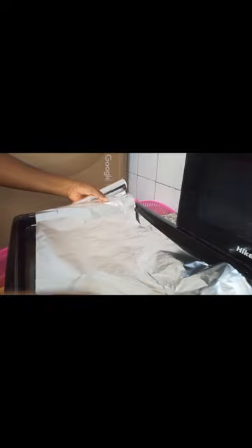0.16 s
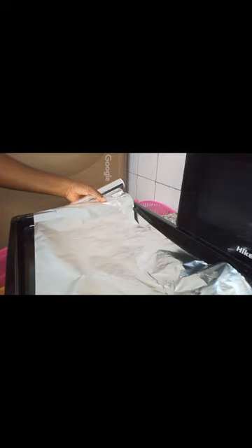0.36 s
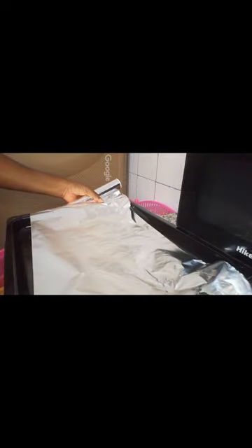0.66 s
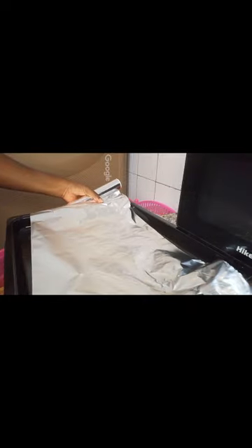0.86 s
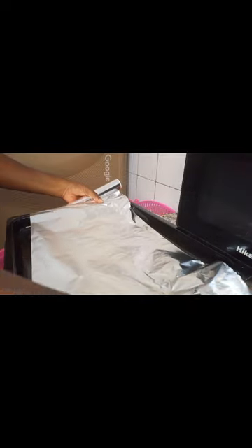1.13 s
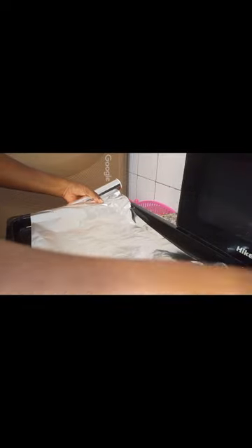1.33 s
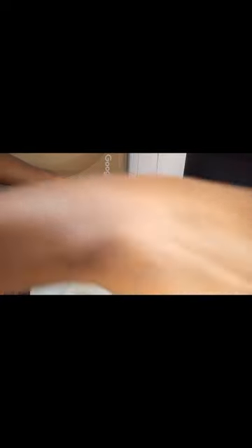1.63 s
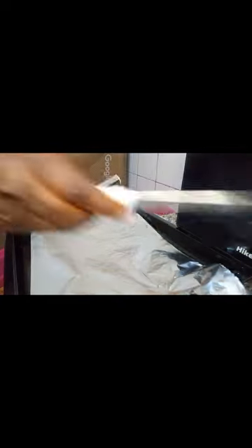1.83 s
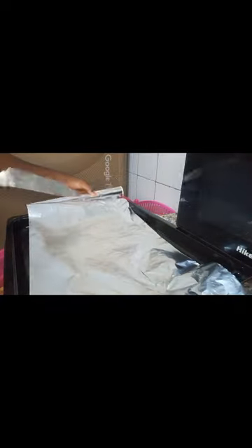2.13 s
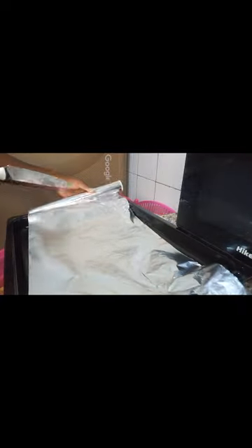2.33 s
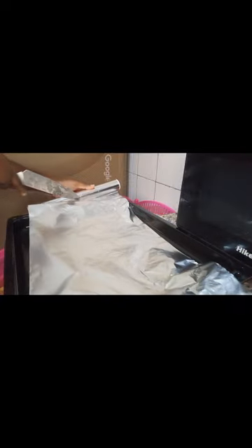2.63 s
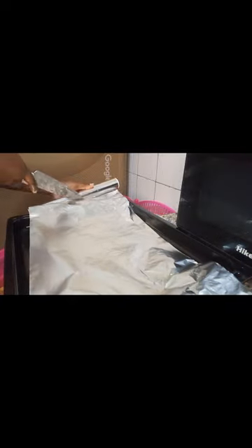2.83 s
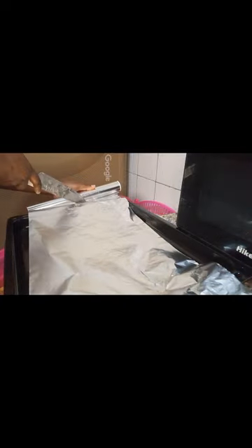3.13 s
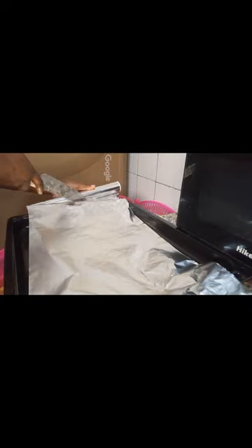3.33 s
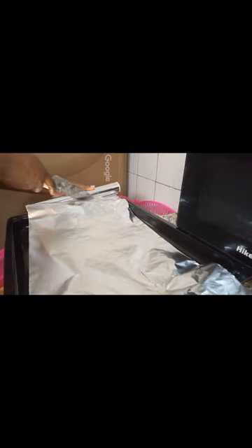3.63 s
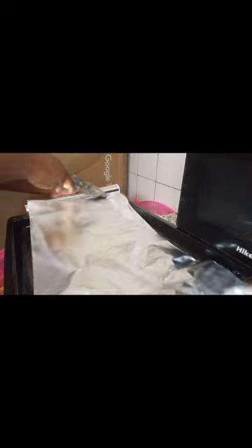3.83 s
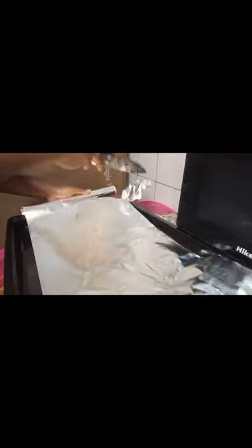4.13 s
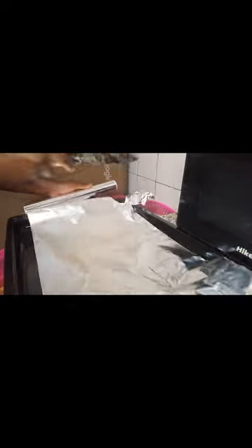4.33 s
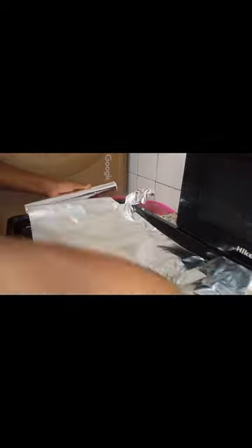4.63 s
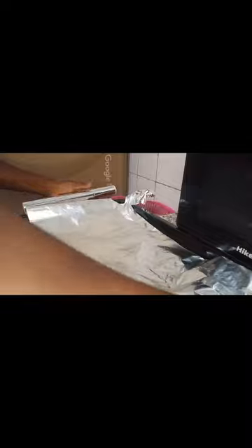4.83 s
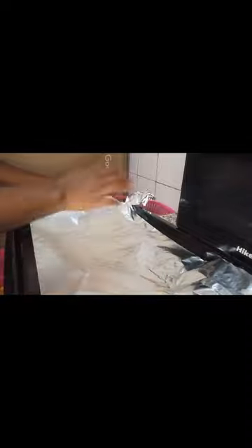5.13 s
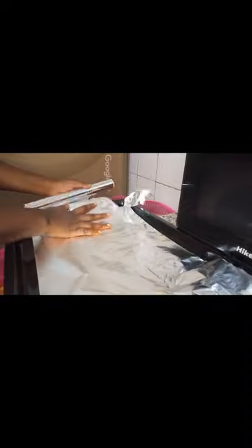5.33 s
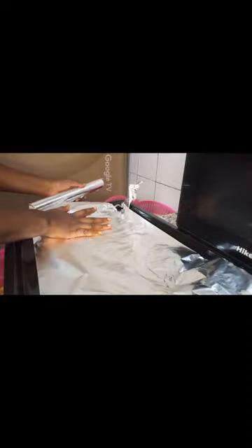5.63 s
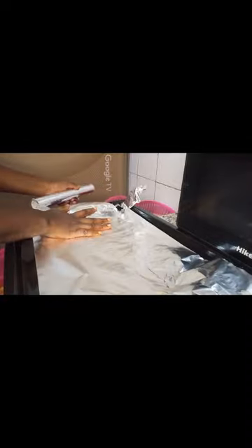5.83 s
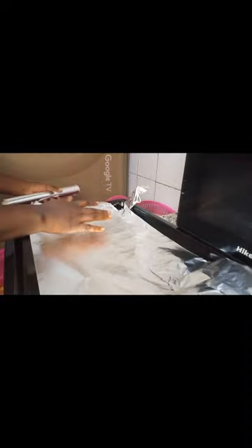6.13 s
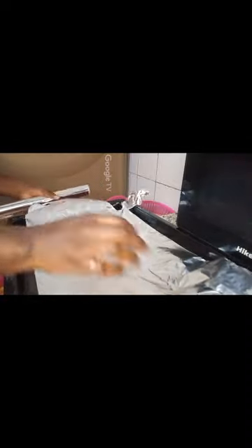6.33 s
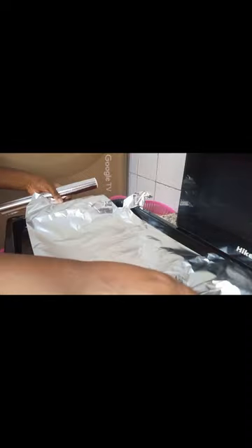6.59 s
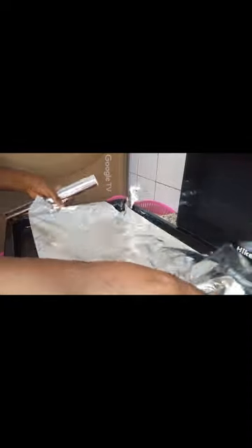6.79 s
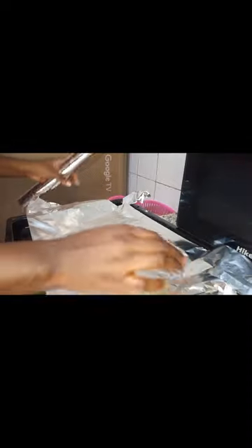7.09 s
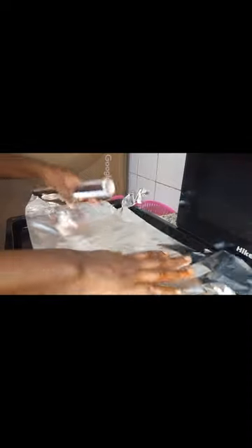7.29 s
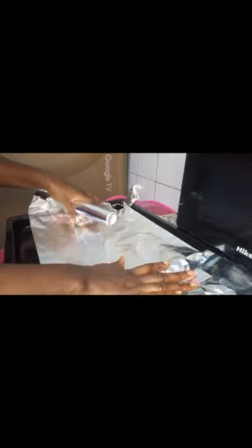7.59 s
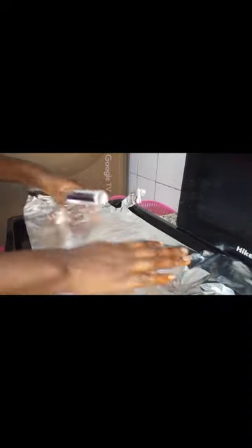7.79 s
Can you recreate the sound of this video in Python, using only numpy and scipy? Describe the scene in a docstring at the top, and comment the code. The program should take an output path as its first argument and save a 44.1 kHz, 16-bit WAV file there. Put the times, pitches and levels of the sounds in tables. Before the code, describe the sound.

Thin aluminium foil is pulled and smoothed over a baking tray, close to a phone in a small tiled kitchen. Bright crackle comes in short overlapping strokes, with tinny panel rattles, sharp snaps and hollow pops. Dull slaps and low tray drumming sound under the palm. It eases briefly after four seconds, then knocks, slaps and rustles on to the end over faint hush.

```python
"""Aluminium foil is pulled from its roll and pressed flat over a baking tray in a small tiled kitchen.
Creases give way in avalanches of clicks and wider panels buckle and rattle: filtered noise under pulse trains.
The palm makes the foil drum on the tray, whose resonances ring; snaps, pops and slaps are decaying noise bursts.
Taut spans hum as decaying sines, and once the foil squeaks as narrow-band noise. A faint hush lies below.
A phone close by hears it with the room, modelled as a decaying stereo noise response."""
import sys
import numpy as np
from scipy import signal
from scipy.fft import rfft, irfft
from scipy.io import wavfile
from scipy.ndimage import uniform_filter1d

SR = 44100
rng = np.random.default_rng(int(sys.argv[2]) if len(sys.argv) > 2 else 0)


def materialize(psi):
    """Save the field psi as 16-bit PCM at rate SR to the path in sys.argv[1].

    A 1-D psi becomes a single channel; in a 2-D psi each row is a channel.
    """
    bounded = np.clip(np.atleast_2d(psi).T, -1, 1)
    quanta = np.round(bounded * 32767).astype(np.int16)
    wavfile.write(sys.argv[1], SR, quanta)


N = 350595
TIME = np.arange(N) / SR

# where the foil is worked: t/s, lag of the left ear/ms
FOIL_PLACE = [(0, -0.05), (.7, -0.31), (1.7, 0.094), (4.3, 0.1), (4.7, -0.41), (5.6, .09), (6.3, 0.11),
              (6.7, -0.27)]
# the hands pull, lift or smooth the foil: start t/s, length/s, fine creasing level/dB, panel flexing level/dB
HAND_STROKES = [(-.04, 0.031, -13, -23), (.05, 0.085, -20.5, -27.5), (0.253, 0.026, -26, -36.5),
                (0.377, 0.12, -21, -27.5), (.53, .16, -18.5, -28), (0.688, 0.13, -26.5, -28),
                (.89, 0.52, -33, -26), (1.067, 0.091, -21, -39), (1.37, 0.24, -25.5, -29.5),
                (1.614, 0.64, -27, -35.5), (1.876, 0.095, -20.5, -25.5), (2.264, 0.086, -21.5, -25.5),
                (2.418, 0.043, -23.5, -28), (2.601, 0.14, -20, -27.5), (2.823, 0.55, -20.5, -23),
                (2.902, 0.048, -14, -19), (3.204, 0.081, -18, -20), (3.4, 0.24, -17.5, -23),
                (3.675, .29, -14, -23), (3.999, 0.28, -18, -30.5), (4.414, 0.2, -38.5, -38),
                (4.556, 0.029, -29.5, -37), (4.7, 0.2, -27.5, -27), (4.908, 0.098, -29, -22),
                (5.119, 0.067, -27.5, -30), (5.235, 0.11, -17, -31), (5.421, 0.26, -18.5, -22.5),
                (5.72, .27, -20.5, -25), (5.988, .13, -16.5, -32), (6.31, 0.097, -25.5, -33.5),
                (6.473, 0.54, -18.5, -24.5), (7.27, 0.055, -26, -28), (7.316, 0.12, -19, -23.5),
                (7.4, .32, -17, -30), (7.703, 0.14, -25, -23.5)]
# relative spectrum of fine creases: f/Hz, density level/dB
CREASE_SPECTRUM = [(200, -24), (800, -21), (2000, -3), (3500, -0.5), (6700, 0.5), (8000, -7), (10000, -5.5),
                   (12300, -2.5), (14500, -6.5)]
# relative spectrum of the wider panels: f/Hz, density level/dB
PANEL_SPECTRUM = [(80, -29.5), (250, -13.5), (550, -0.5), (1800, 4), (3000, -3), (6000, -12), (16000, -55)]
# relative spectrum of the sheet against the tray: f/Hz, density level/dB
SHEET_SPECTRUM = [(25, -31), (50, -24), (85, 0.5), (200, -2.5), (450, 3.5), (800, 1.5), (2000, -6.5),
                  (8000, -42)]
# resonances of a wide panel: f/Hz, bandwidth/Hz, gain/dB
PANEL_MODES = [(1115, 65, -6), (1860, 230, -1), (2450, 120, -5.5), (3150, 140, -12.5)]


def undb(db):
    """Amplitude ratio: a level in decibels becomes a linear gain."""
    return 10 ** (np.asarray(db) / 20)


def unit(x):
    """Normalisation by effective value: the same sound at rms 1."""
    return x / np.sqrt(np.mean(x ** 2))


def curve(rows, at=TIME):
    """Linear interpolation: a control runs straight between its points."""
    return np.interp(at, *np.transpose(rows))


def fade(t, t60):
    """Exponential damping: amplitude falls 60 dB in t60 seconds."""
    return np.exp(-np.log(1000) * t / t60)


def log_curve(rows, hz):
    """Logarithmic frequency scale: a table over frequency, straight on a log axis."""
    f, value = np.transpose(rows)
    return np.interp(np.log(hz + 1), np.log(f), value)


def ring(x, response):
    """Linear superposition: convolve each channel with an impulse response."""
    return signal.oaconvolve(x, response, axes=-1)[:, :x.shape[-1]]


def colour(x, spectrum):
    """Minimum-phase filtering: a folded cepstrum gives a causal filter of the given (Hz, dB) response."""
    size = 4096
    gain = undb(log_curve(spectrum, np.fft.rfftfreq(size, 1 / SR)))
    cepstrum = irfft(np.log(gain))
    # fold negative times onto positive ones
    cepstrum[1:size // 2] *= 2
    cepstrum[size // 2 + 1:] = 0
    response = irfft(np.exp(rfft(cepstrum)))
    return ring(x, response[None])


def resonance(x, hz, width_hz):
    """Damped oscillator: a two-pole band-pass with gain 1 at the centre."""
    return signal.lfilter(*signal.iirpeak(hz, hz / width_hz, fs=SR), x)


def body(x, modes):
    """Modal superposition: a sound through a sum of (Hz, width, dB) resonances."""
    return sum(undb(db) * resonance(x, hz, width) for hz, width, db in modes)


def stereo_noise(size, apart):
    """Interaural coherence: two noises, alike (apart 0) or unrelated (apart 1)."""
    apart = np.clip(apart, 0, 1)
    shared = np.sqrt(1 - apart) * rng.standard_normal(size)
    return shared + np.sqrt(apart) * rng.standard_normal((2, size))


def burst(envelope, apart):
    """High modal density: the ringing of thin foil acts as noise under an envelope."""
    return stereo_noise(len(envelope), apart) * envelope


def struck(x, db, first_s):
    """Onset level: scale a blow so that its first moments have the given rms level."""
    onset = x[:, :int(first_s * SR)]
    return x / onset.std() * undb(db)


def add(out, s, sound):
    """Superposition: mix a stereo sound in at time s."""
    start = max(int(s * SR), 0)
    out[:, start:start + sound.shape[1]] += sound[:, :N - start]


def kitchen(x, wet_db=-5, early_db=-7):
    """Reverberation: diffuse reflections set in 3 ms after the direct sound and decay fastest in the treble."""
    # reverberation time of the kitchen: f/Hz, t60/s
    decay_times = [(100, 0.53), (1500, 0.32), (4000, 0.48), (8000, 0.25), (14000, 0.11)]
    t = np.arange(2 ** 14) / SR
    hz = np.fft.rfftfreq(len(t), 1 / SR)
    mid, side = rfft(rng.standard_normal((2, len(t))))
    # long waves reach both ears alike
    width = np.minimum(hz / 1500, 1)
    field = (mid + np.array([[1], [-1]]) * width * side) / np.sqrt(1 + width ** 2)
    centres, t60s = np.transpose(decay_times)
    tail = 0
    # overlapping bands, each with its own decay
    for band, t60 in zip(np.eye(len(t60s)), t60s):
        weight = log_curve(np.c_[centres, band], hz)
        tail = tail + irfft(field * weight) * fade(t, t60)
    tail = tail * (t > .003)
    # close tiles and worktop strengthen the start
    early = tail * fade(t, 0.26)
    response = (undb(wet_db) * unit(tail) + undb(early_db) * unit(early)) / np.sqrt(len(t))
    return x + ring(x, response)


def jerks(per_s, t60):
    """Stick-slip: small jerks start at once and die away; the result has mean 0 and spread 1."""
    slips = (rng.random(N) < per_s / SR) * rng.random(N)
    # t60 belongs to the sum before the square root
    swell = np.sqrt(signal.lfilter([1], [1, -fade(1 / SR, t60)], slips))
    return unit(swell - swell.mean())


def effort(moves, attack_s, t60):
    """Power addition: overlapping (start s, length s, dB) movements build up, hold and die away."""
    power = np.zeros(N)
    for s, length_s, db in moves:
        t = TIME[max(int(s * SR), 0):] - s
        attack = np.clip(t / attack_s, 0, 1)
        settling = fade(np.maximum(t - length_s, 0), t60)
        power[N - len(t):] += (undb(db) * attack * settling) ** 2
    return power


def creasing_db():
    """Plastic yielding: fine creases give way through each stroke, then settle to a resting floor."""
    moves = [(s, length_s, db) for s, length_s, db, _ in HAND_STROKES]
    held_power = undb(-45) ** 2  # held foil never quite rests
    return 10 * np.log10(effort(moves, attack_s=0.025, t60=0.33) + held_power)


def flexing_db():
    """Elastic bending: the same strokes flex the wider panels, which take longer to settle."""
    moves = [(s, length_s, db) for s, length_s, _, db in HAND_STROKES]
    held_power = undb(-47) ** 2
    return 10 * np.log10(effort(moves, attack_s=0.025, t60=0.63) + held_power)


def drumming_db():
    """Mechanical coupling: the pressing palm and, more weakly, the flexing sheet drive the tray."""
    # the palm presses the sheet on the tray: start t/s, length/s, drumming level/dB
    palm_presses = [(.1, 0.065, -30), (.39, 0.28, -33.5), (.63, 0.05, -24), (.9, 0.42, -24.5),
                    (1.3, 0.19, -28.5), (2.3, 0.061, -28.5), (3.1, 0.55, -31), (3.63, 0.15, -23),
                    (4.7, 0.31, -25.5), (5.06, 0.73, -35), (5.47, 0.3, -27), (6.6, 0.065, -20),
                    (6.8, 0.22, -24.5), (7.71, .15, -17.5)]
    palm_power = effort(palm_presses, attack_s=0.034, t60=0.73)
    sheet_power = undb(flexing_db() - 8) ** 2
    return 10 * np.log10(palm_power + sheet_power)


def crackle(level_db, spectrum, per_s, spread_db, max_gap_s, t60, patchy_db, apart, count=5):
    """Avalanche statistics: buckles come in short runs; each patch of foil has its own colour and echoes."""
    out = np.zeros((2, N))
    hz = np.geomspace(25, 16000, 80)
    for _ in range(count):
        own = np.random.default_rng(rng.integers(2 ** 31))
        chance = own.random((int(per_s * N / SR / count), 9))
        # each run is one buckle and three weaker followers
        s = chance[:, :1] * N / SR + max_gap_s * np.cumsum(chance[:, 2:6], axis=1)
        # many small and few large, unless spread_db is 0
        strength = undb(-spread_db * np.log(np.maximum(chance[:, 1:2], .025)))
        push = strength * np.c_[np.ones(len(s)), chance[:, 6:] ** 2]
        energy = np.bincount((s * SR).astype(int).ravel() % N, push.ravel() ** 2, N)
        # every buckle rings for a moment
        ringing = signal.lfilter([1], [1, -fade(2 / SR, t60)], energy + 1e-12)
        envelope = unit(np.sqrt(ringing))
        left, right = burst(envelope * undb(level_db), apart)
        # the left ear's lag follows the place of work, in whole samples
        heard_at = np.rint((TIME - curve(FOIL_PLACE) / 1000) * SR)
        left = np.interp(heard_at, np.arange(N), left)
        hills = uniform_filter1d(rng.standard_normal(len(hz)), size=4) * 2
        shape_db = log_curve(spectrum, hz) + patchy_db * hills
        # equal power for every patch
        shape_db -= 10 * np.log10(np.sum(undb(shape_db) ** 2 * np.gradient(hz)) * 2 / SR)
        out += kitchen(colour(np.array([left, right]), np.c_[hz, shape_db]))
    return out / np.sqrt(count)


def creases(surge_db):
    """Event density: separate ticks merge into a rustle that takes over as the foil is worked harder."""
    # how tightly the foil is creased: t/s, top treble relative to the lower treble/dB
    tightness = [(.6, 0.5), (1.0, 0.5), (1.1, 5), (1.4, 3), (2.6, 2), (3.3, 2), (3.9, 2.5), (5.3, 6)]
    level_db = creasing_db() + surge_db
    # the rustle's share of the power
    dense = np.clip(.48 + .025 * (level_db + 22), .25, .7)
    ticks = crackle(level_db + 10 * np.log10(1 - dense), CREASE_SPECTRUM, per_s=95, spread_db=4.0,
                    max_gap_s=.005, t60=0.021, patchy_db=1.5, apart=0.75)
    rustle = crackle(level_db + 10 * np.log10(dense), CREASE_SPECTRUM, per_s=750, spread_db=0.0,
                     max_gap_s=.004, t60=0.012, patchy_db=-0.5, apart=0.97)
    sound = ticks + rustle
    # tighter creases have smaller facets, which ring higher
    high_pass = signal.butter(2, 7500, "high", fs=SR, output="sos")
    top = signal.sosfiltfilt(high_pass, sound)
    return sound + top * (undb(curve(tightness)) - 1)


def panels(surge_db):
    """Bistable buckling: wider panels flip back and forth with a tinny, resonant rattle."""
    rattle = crackle(flexing_db() + surge_db, PANEL_SPECTRUM, per_s=240, spread_db=4.0,
                     max_gap_s=.008, t60=0.044, patchy_db=2.0, apart=0.3)
    return rattle + undb(-16.5) * body(rattle, PANEL_MODES)


def drumming(surge_db):
    """Forced vibration: the sheet patters under the moving hand, and the tray rings along."""
    # resonances of the foil-covered tray: f/Hz, bandwidth/Hz, gain/dB
    tray_modes = [(76, 8.9, -1), (108, 11, -1), (140, 16, 2.5), (201, 32, 1), (255, 36, 1), (315.5, 12, -1),
                  (441, 47, -12.5), (565, 22, -0.5)]
    patter = crackle(drumming_db() + surge_db / 2, SHEET_SPECTRUM, per_s=240, spread_db=1.1,
                     max_gap_s=.012, t60=0.017, patchy_db=2.0, apart=0.027, count=3)
    return body(patter, tray_modes) + undb(-9) * patter


def hush():
    """Stationary noise: a faint, steady, partly coherent background."""
    # relative spectrum of the hush: f/Hz, density level/dB
    hush_spectrum = [(25, -27), (100, 13), (400, 2), (16000, 1)]
    noise = colour(stereo_noise(N, apart=0.67), hush_spectrum)
    return unit(noise) * undb(-41.5)


def snaps():
    """Triggered avalanche: a sharp crack sets off a dying run of smaller clicks."""
    # a crease snaps and sets off its neighbours: t/s, onset level/dB
    snap_events = [(0.093, -22), (0.1162, -9.5), (.235, -20), (.389, -14.5), (0.4667, -10.5),
                   (0.5405, -8.5), (1.0828, -9), (1.411, -20), (2.246, -13.5), (2.3249, -9), (2.45, -17),
                   (2.6242, -11.5), (2.7112, -9), (3.0774, -24), (3.475, -5.5), (4.423, -25), (4.573, -21),
                   (4.6926, -19), (4.7362, -12), (4.9454, -13), (5.142, -17.5), (5.247, -8.5), (5.445, -20),
                   (6.3155, -21), (6.4897, -9)]
    out, t = np.zeros((2, N)), np.arange(SR // 5) / SR
    for s, db in snap_events:
        clicks = rng.random((1, len(t))) < 900 / SR  # 900 per second
        followers = ring(clicks, fade(t, 0.0055)[None])[0]
        envelope = fade(t, .016) + .4 * followers * fade(t, 0.049)
        snap = colour(burst(envelope, apart=.7), CREASE_SPECTRUM)
        add(out, s, struck(snap, db, first_s=.004))
    return kitchen(out)


def hums():
    """Tension sets pitch: a plucked span starts sharp, settles, and wavers as the hand shifts its tension."""
    # a taut span of foil is plucked: t/s, pitch f/Hz, level/dB, t60/s
    plucked_spans = [(0.13, 159, -23.5, 0.5), (0.669, 80.5, -20, 0.33), (.965, 436, -14.5, 0.21),
                     (1.01, 201, -16, 0.42), (3.215, 610, -10.5, 0.22), (3.89, 524, -14.5, 0.28),
                     (4.8, 205, -18, 0.31), (6.612, 158, -17, 0.25), (6.817, 343, -16, 1),
                     (7.78, 108.6, -23, 0.77)]
    out, t = np.zeros((2, N)), np.arange(SR // 2) / SR
    for s, hz, db, t60 in plucked_spans:
        waver = unit(uniform_filter1d(rng.standard_normal(len(t)), size=900))
        pitch_hz = hz * (1 + 0.027 * fade(t, 0.061) + 0.02 * waver)
        phase = 2 * np.pi * np.cumsum(pitch_hz) / SR
        envelope = fade(t, t60) * (1 - fade(t, 0.028))
        tone = np.sin(phase) * envelope * undb(db + 2 * waver)
        add(out, s, np.array([tone, tone]))
    return out


def slaps():
    """Impact excitation: a dull slap shakes the span under the hand, and wider panels rattle with it."""
    # the sheet slaps the tray: t/s, blow level/dB (before each part's offset), centre f/Hz
    slap_events = [(0.392, -20.5, 580), (0.661, -17, 200), (1.188, -7.5, 280), (1.223, -19.5, 293),
                   (3.289, -12.5, 624), (3.459, -11.5, 620), (3.707, -16, 400), (4.568, -26, 616),
                   (4.697, -20.5, 545), (5.484, -14, 207), (6.632, -10.5, 186), (6.824, -14, 347),
                   (7.722, -22, 333)]
    out, t = np.zeros((2, N)), np.arange(SR // 3) / SR
    for s, db, hz in slap_events:
        contact = burst(fade(t, 0.083), apart=0.073)
        thud = resonance(colour(contact, SHEET_SPECTRUM), hz, 0.63 * hz)
        rattle = colour(contact * fade(t, 0.054), PANEL_SPECTRUM)
        slap = struck(thud, db - 6.5, first_s=0.032) + struck(rattle, db - 15.0, first_s=0.031)
        add(out, s, slap)
    return kitchen(out)


def pops():
    """Snap-through: a panel jumps to its other stable shape with a hard knock and rings briefly."""
    # a panel of the sheet pops through: t/s, onset level/dB
    pop_events = [(0.899, -15), (1.188, -15.5), (1.234, -19), (1.257, -20), (1.304, -18), (1.371, -12),
                  (2.344, -20), (2.451, -18), (3.288, -11.5), (3.462, -11.5), (3.716, -16.5),
                  (4.693, -12.5), (4.738, -13.5), (4.803, -14), (4.844, -11), (4.946, -15.5),
                  (5.042, -16.5), (6.513, -14.5), (6.823, -15.5), (7.34, -17.5)]
    # relative spectrum of the knock: f/Hz, density level/dB
    pop_spectrum = [(80, -10.5), (400, -3), (1100, 6), (2200, -3), (4000, -3), (16000, -25)]
    out, t = np.zeros((2, N)), np.arange(SR // 8) / SR
    for s, db in pop_events:
        envelope = fade(t, 0.011) + undb(-25) * fade(t, 0.11)
        knock = colour(burst(envelope, apart=0.19), pop_spectrum)
        pop = knock + undb(12) * body(knock, PANEL_MODES)
        add(out, s, struck(pop, db, first_s=.005))
    return kitchen(out)


def squeak(s=2.2535, hz=12400, width_hz=750, db=-12, rise_s=0.002):
    """Friction excitation: foil slips on foil in one very high, short burst of narrow-band noise."""
    out, t = np.zeros((2, N)), np.arange(SR // 20) / SR
    slip = burst(t * np.exp(-t / rise_s), apart=0.27)
    narrow = resonance(resonance(slip, hz, width_hz), hz, 2 * width_hz)
    add(out, s, struck(narrow, db, first_s=0.016))
    return kitchen(out)


def scene():
    """Interaural level difference: the nearer microphone hears the foil louder, over a faint hush."""
    surge_db = 1.06 * jerks(per_s=44, t60=0.022)
    foil = creases(surge_db) + panels(surge_db) + drumming(surge_db)
    foil = foil + snaps() + hums() + slaps() + pops() + squeak()
    # left over right: 1.28 dB, and 3.5 dB more per ms of lead
    left_db = 1.28 - 3.5 * curve(FOIL_PLACE)
    foil_db = -2.69
    return foil * undb(np.array([left_db, -left_db]) / 2 + foil_db) + hush()


def record(dry):
    """Band limiting: the phone clips peaks beyond full scale and cuts the top above 15.9 kHz."""
    low_pass = signal.ellip(10, .2, 70, 15900, fs=SR, output="sos")
    return signal.sosfilt(low_pass, np.clip(dry, -1, 1))


dry = scene()
out = record(dry)
materialize(out)
```